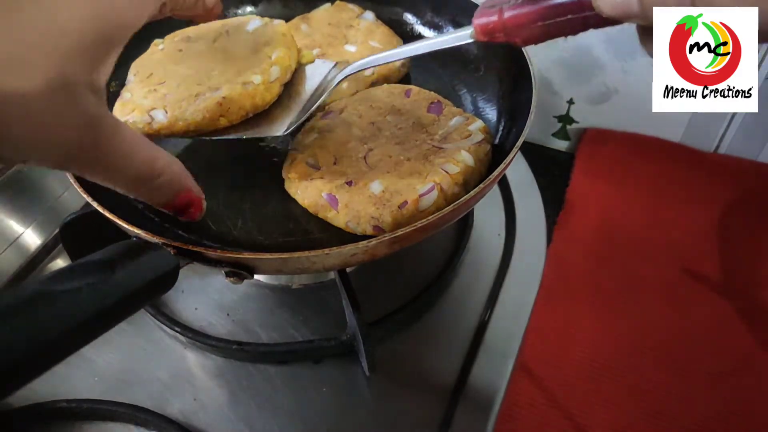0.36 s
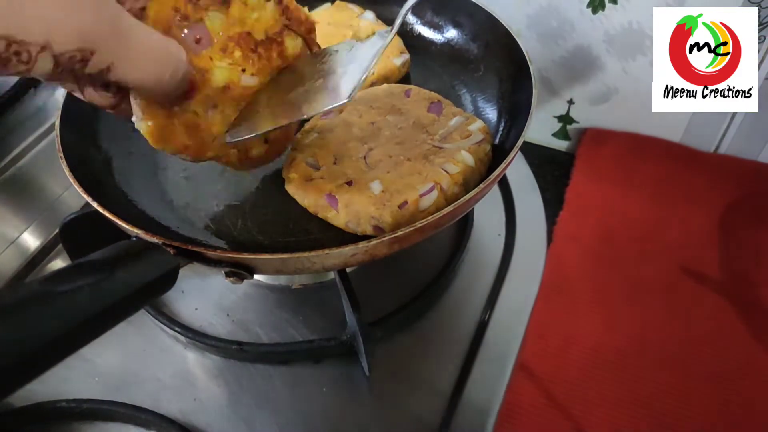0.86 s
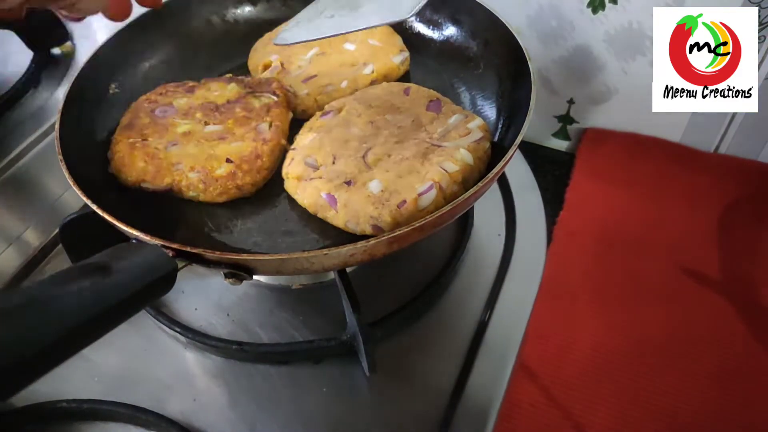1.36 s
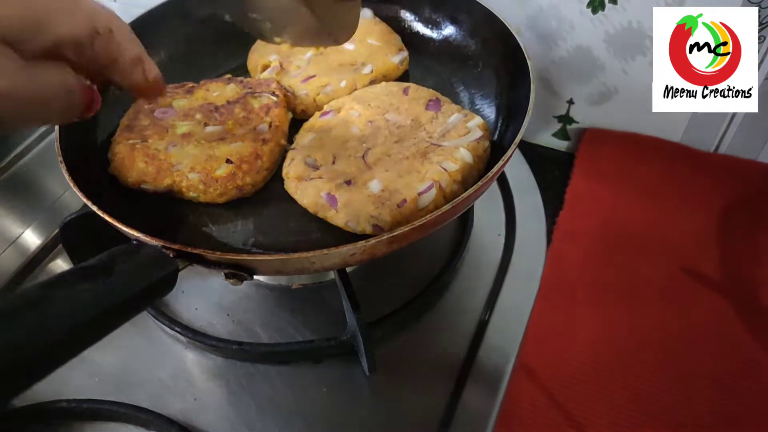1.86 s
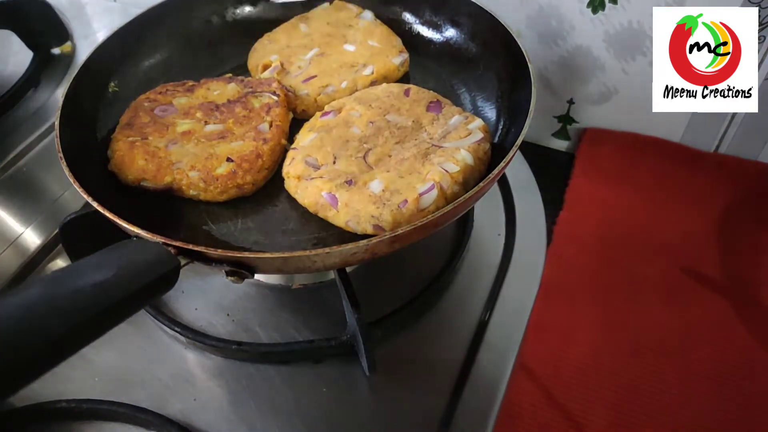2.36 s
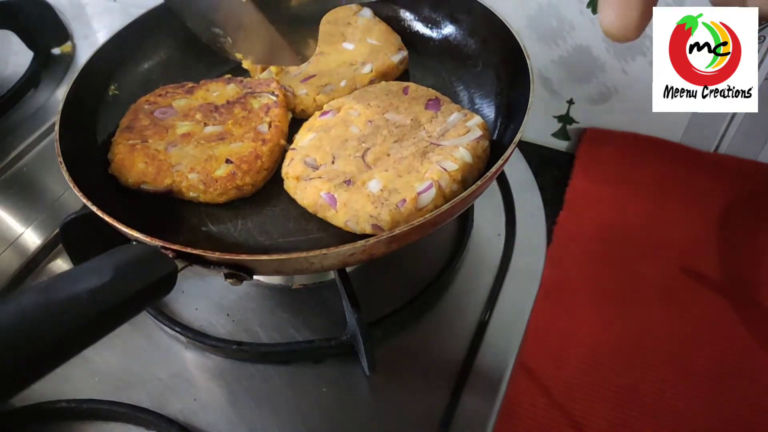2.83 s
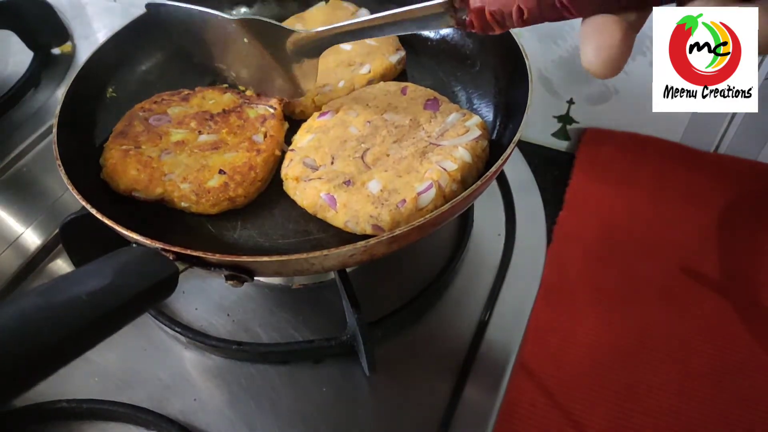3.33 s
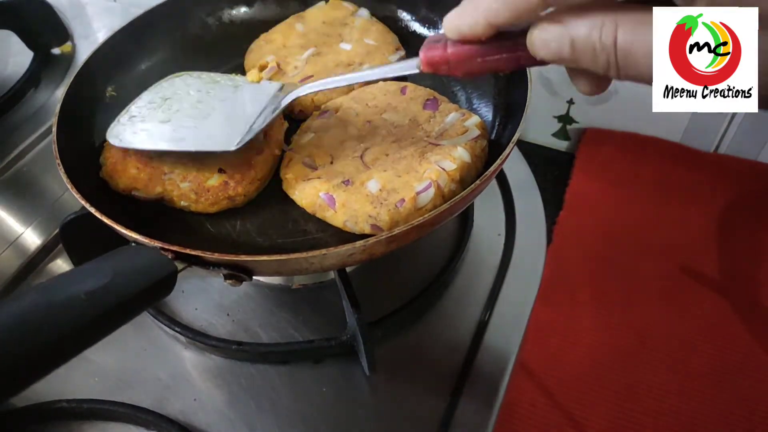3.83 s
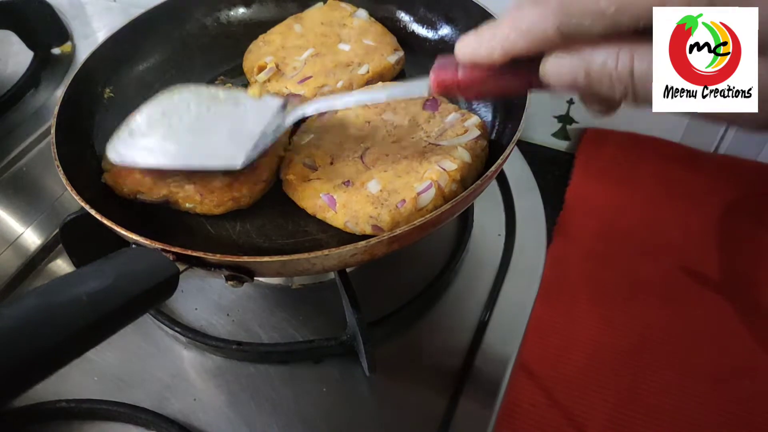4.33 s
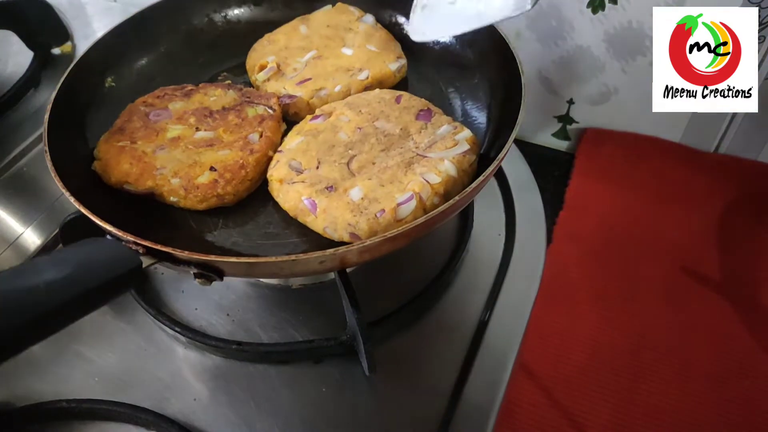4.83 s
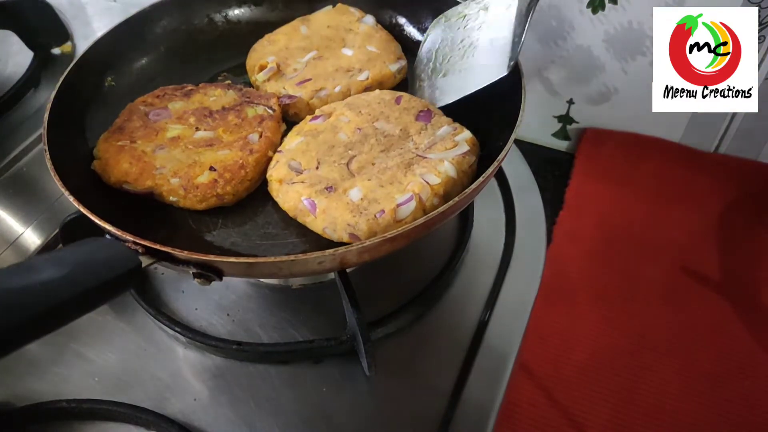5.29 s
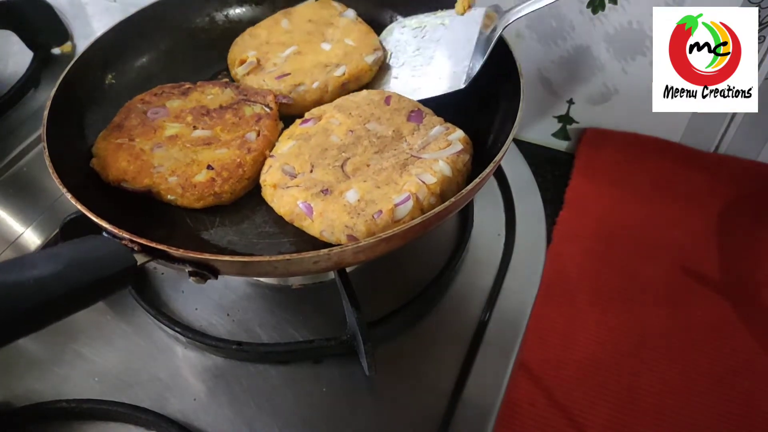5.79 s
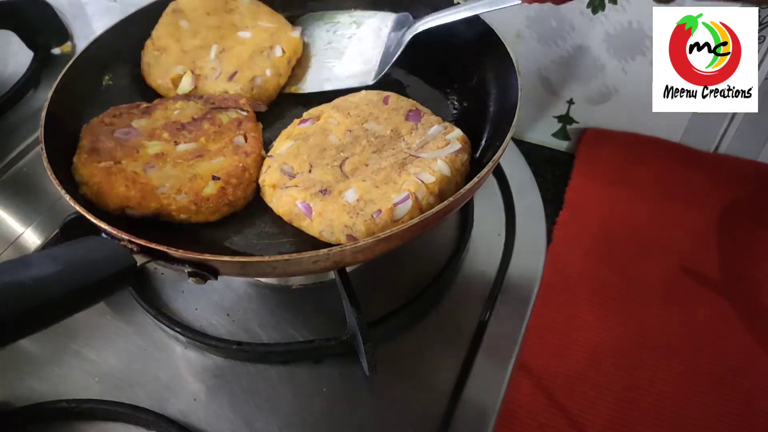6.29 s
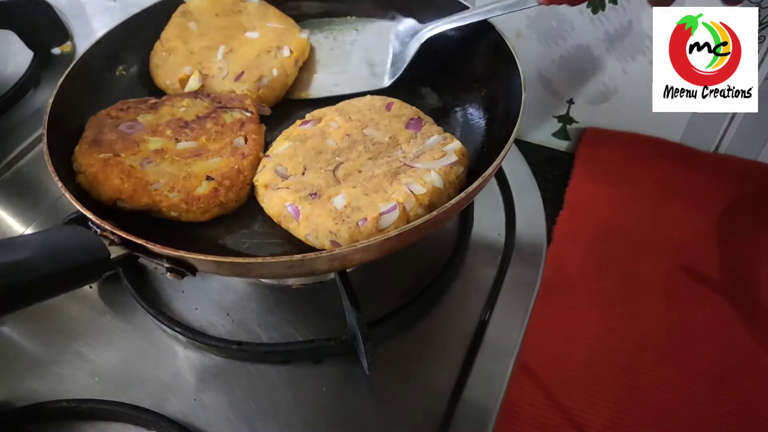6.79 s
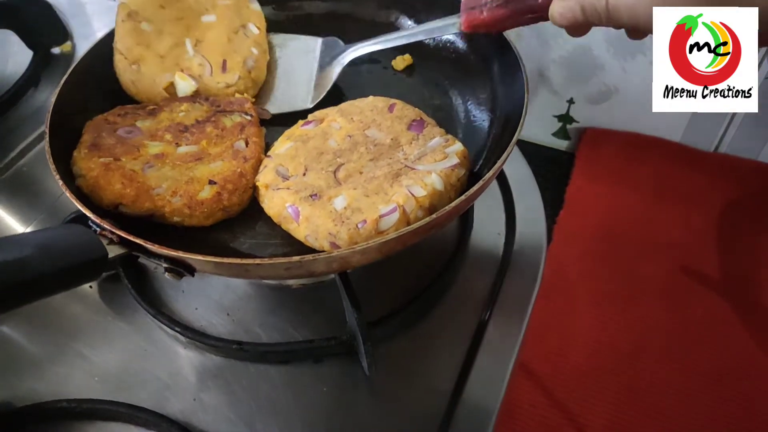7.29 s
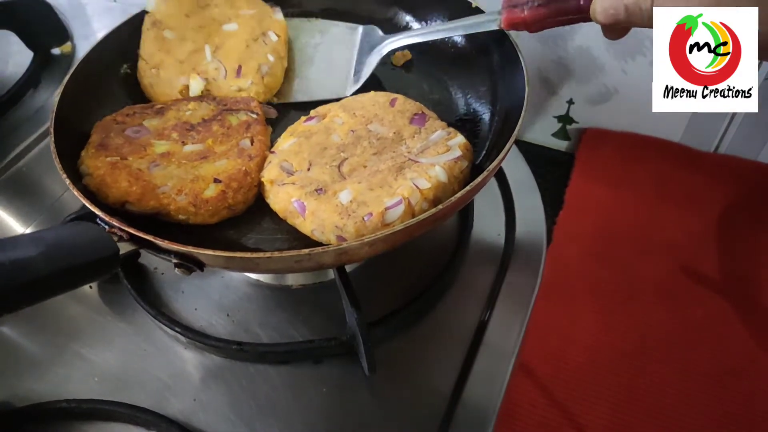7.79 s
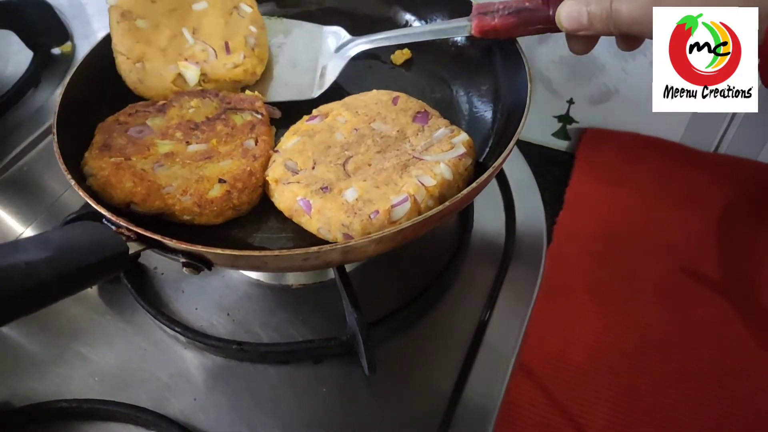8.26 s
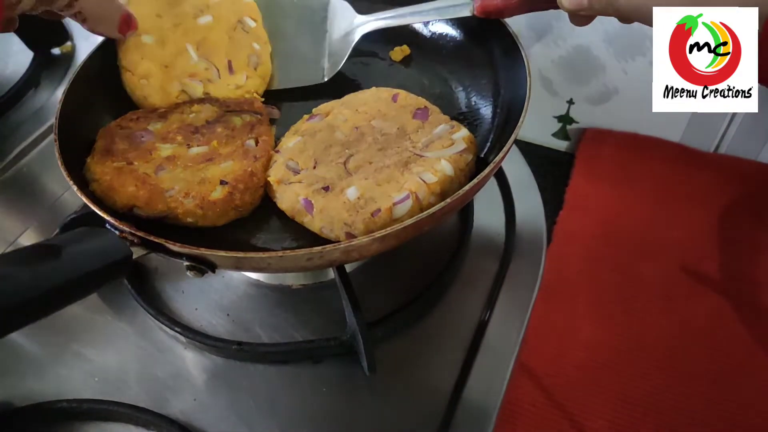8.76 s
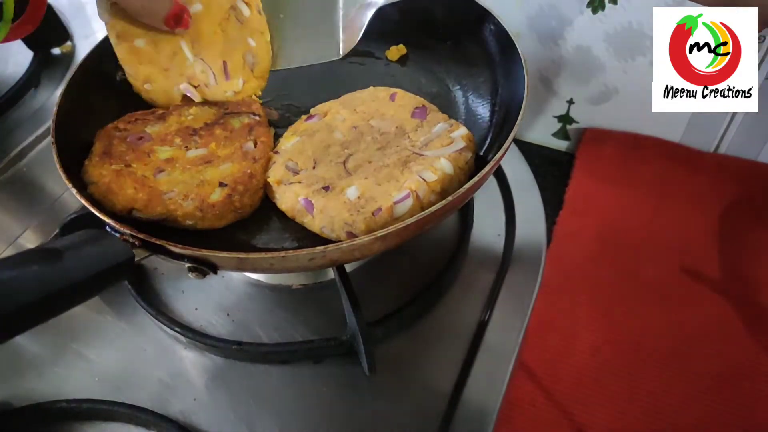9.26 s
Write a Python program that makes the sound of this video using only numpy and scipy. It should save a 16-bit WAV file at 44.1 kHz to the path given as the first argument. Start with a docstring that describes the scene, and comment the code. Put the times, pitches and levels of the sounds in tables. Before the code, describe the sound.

Close stereo sound of patties frying in a shallow pan in a kitchen. A fine bright sizzle starts quietly, flares as food is turned and pressed, sinks, then rises again. Large bubbles spit sharply over it. A steel spatula makes short grating scrapes and a few taps, and patties settle with soft low thuds. Low room rumble lies underneath.

```python
"""Patties sizzle in hot fat in a shallow pan, close to a two-port microphone in a kitchen: from the start steam
bubbles burst by the thousand as filtered clicks, over a low noise rumble of the room, and large ones spit and ring.
From about 1 s a steel spatula scrapes (random slips through pan modes) while a faint far tone glides up; then it
taps (chattering contacts) and food lands with soft thuds (puffs of low noise). The sizzle flares and sinks
throughout, and from 3.7 s a few droplets tick on the right port as one-sided pushes."""
import sys
import numpy as np
from scipy import signal
from scipy.io import wavfile
from scipy.ndimage import uniform_filter1d

SR = 44100
rng = np.random.default_rng(int(sys.argv[2]) if len(sys.argv) > 2 else 0)


def elevation(decibels):
    """Turn decibel levels (scalar or array-like) into linear amplitude ratios."""
    levels = np.asarray(decibels, float)
    return 10 ** (levels / 20)


def waveform_to_disk(signal):
    """Save audio, clipped to [-1, 1], as 16-bit WAV at the path in sys.argv[1]."""
    frames = np.transpose(np.atleast_2d(signal))
    scaled = np.clip(frames, -1, 1) * 32767
    samples = np.round(scaled).astype(np.int16)
    wavfile.write(sys.argv[1], SR, samples)


N = 424683  # length of the scene [samples]
LAG = 8  # how much later the left port hears the middle of the pan [samples]

# where the frying is liveliest: (time [s], pitch of the commonest bubble [Hz],
# how far it stands out of the fizz [dB], left minus right [dB])
SPOT = [(.9, 10200, -4, -2), (1.0, 6130, 3, -1.5), (1.3, 9600, -1, -0.5), (3.4, 8800, 0.5, 0),
        (4.0, 9700, 1, -0.5), (6.3, 10200, 0.5, 0), (7.8, 8440, 1, 0.5), (8.5, 9600, 0, 0.5),
        (8.9, 9900, 5, 4), (9.63, 8800, -5.5, -2)]
# modes in which pan and blade ring together: (frequency [Hz], relative level [dB], decay by 60 dB [s])
PAN = [(360, -0.5, 0.05), (635, -6, 0.1), (895, 2, 0.05), (1030, 0, 0.045), (1500, 6, 0.05),
       (2050, -4, 0.045), (2344, 5.5, 0.08), (2520, 4, 0.05), (2780, 5, 0.04), (3120, 5, 0.025),
       (3930, 5, 0.025), (4680, 5, 0.036), (5230, -0.5, 0.036), (6090, 0, .02)]


def evened(x):
    """Scales to rms 1."""
    return x / np.sqrt(np.mean(x ** 2) + 1e-20)


def read(points, hz):
    """Reads a spectrum on a log-frequency axis."""
    f, value = np.transpose(points)
    return np.interp(np.log(hz + 1), np.log(f + 1), value)


def add(mix, s, sound):
    """Mixes a sound in at time s."""
    part = mix[:, round(s * SR):][:, :sound.shape[1]]
    part += sound[:, :part.shape[1]]


def band(x, hz, width_hz):
    """A broad resonance."""
    return signal.lfilter(*signal.iirpeak(np.clip(hz, 50, 18000), max(hz / width_hz, .3), SR), x)


def bowl(x, pan_db, t60, echo_db, lag=LAG):
    """Direct sound, later on the left, then dense echoes off pan wall and hob; only their treble differs by port."""
    t = np.arange(round(.06 * SR)) / SR
    shared, left, right = rng.standard_normal((3, len(t)))
    low = signal.butter(1, 900, fs=SR)
    echoes = np.array([own + signal.lfilter(*low, shared - own) for own in (left, right)])
    echoes *= elevation(-60 * t / t60) * (t > .0005)
    echoes *= elevation(echo_db) / np.linalg.norm(echoes, axis=1)[:, None]
    # the direct sound joins the echoes as one sample per port
    echoes[0, lag] += elevation(pan_db / 2)
    echoes[1, 0] += elevation(-pan_db / 2)
    return signal.oaconvolve(x[None], echoes, axes=1)


def swells(rows, t):
    """dB of each row over time: a straight climb to its peak and a fall after it."""
    s, db, rise, fall = np.transpose(rows)[:4, :, None]
    return db - 10 * np.where(t < s, (s - t) / abs(rise), (t - s) / abs(fall))


def liveliness(t):
    """Relative dB of the fizz and of the dull sizzle: the flares add their power to the simmer."""
    # the fat's steady simmer between flares: (time [s], relative level of the fizz of small bubbles [dB])
    simmer = [(0, -42.5), (.33, -47), (.94, -48), (1.25, -42), (2.1, -35), (2.9, -38.5), (3.75, -42),
              (4.85, -44.5), (5.55, -42.5), (5.96, -34), (6.25, -30), (7.06, -31.5), (7.4, -36.5),
              (7.6, -38.5), (8.43, -43), (9.13, -37), (9.63, -34)]
    # flares as food lands, is pressed or is shifted on wet fat: (peak time [s], relative peak level [dB],
    # time to rise 10 dB [s, sign ignored], time to fall 10 dB [s, sign ignored], extra dull sizzle [dB])
    flares = [(0.944, -36, -0.01, 0.3, 8.5), (.98, -31.5, -0.0452, 0.07, 0.5), (1.32, -28, -0.07, .5, 0),
              (1.71, -27.5, -0.14, 0.24, -4.5), (3.18, -30, 0.2, 0.56, 1), (3.425, -27.5, 0.17, 0.13, -1.5),
              (3.975, -25.5, 0.1, 0.36, 2), (4.133, -22.5, 0.16, 0.016, -3.5), (4.2, -28, 0.06, 0.13, 1),
              (7.426, -36.5, 1, 0.4, 13), (7.74, -31.5, 0, 0.49, 4), (8.059, -28.5, 0.16, 0.22, 3),
              (8.57, -36.5, 0.2, 1.5, 9), (8.83, -26.5, 0.12, 0.23, 0), (9.08, -42, 0.1, -0.4, -9),
              (9.371, -36.5, 0.06, 0.1, 23)]
    power = elevation(np.vstack([np.interp(t, *np.transpose(simmer)), swells(flares, t)])) ** 2
    fizz_db = 10 * np.log10(power.sum(0))
    extra_db = np.transpose(flares)[4] @ power[1:] / power.sum(0)
    # large slow bubbles follow the fizz: 1.435 dB per dB, from -55 dB where the fizz is at -38 dB
    dull_db = -55 + 1.435 * (fizz_db + 38) + extra_db
    return fizz_db, dull_db


def bursts(per_s, spread_db, clump_db, echo_db, count):
    """Bubbles burst at many spots, mostly small, in clumps; each spot has its own pitch, side and echoes."""
    clumps = evened(uniform_filter1d(rng.standard_normal(N // 64 + 1), 8)).repeat(64)[:N]
    size = elevation(spread_db * np.minimum(rng.exponential(1, N), 4) + clump_db * clumps)
    size *= rng.random(N) < per_s / SR
    size *= rng.choice([-1., 1.], N)
    spot = rng.integers(0, count, N)
    out = np.zeros((2, N))
    for k, (height, side) in enumerate(rng.uniform(-1.083, 1, (count, 2))):
        clicks = size * (spot == k)
        clicks = 0.28 * clicks + band(clicks, 9500 + 5500 * height, 3300)
        out += bowl(clicks, 2 + 14 * side, .03, echo_db, lag=LAG + round(5 * side))[:, :N]
    return evened(out)


def sizzle():
    """Small bubbles give the bright fizz, humped at the commonest size; large ones the dull part."""
    # spectrum of the fizz: (frequency [Hz], relative level per Hz [dB])
    fizz_tone = [(1500, -34.5), (3000, -14), (5000, -4.5), (7000, -0.5), (8500, 1), (11000, 0),
                 (13500, -0.5), (15500, -3.5), (16500, -7.5)]
    # spectrum of the dull sizzle: (frequency [Hz], relative level per Hz [dB])
    dull_tone = [(300, -9), (800, -3.5), (1500, 1.5), (2500, 6.5), (3800, 5), (5500, 4.5), (9000, -12)]
    surge_db, tint_db = .8, 1.2  # rms of the fizz's surges and of its patches of colour [dB]

    def whitened(z):
        """Flattens the mean spectrum of bursts."""
        return z / np.sqrt(uniform_filter1d(np.mean(abs(z) ** 2, (0, 2)), 9))[:, None]

    hz, t, small = signal.stft(bursts(4500, 3.8, 1.3, 1, count=24), SR, nperseg=256, noverlap=192)
    large = signal.stft(bursts(3000, 4, 1.5, 4, count=10), SR, nperseg=256, noverlap=192)[2]
    small, large = whitened(small), whitened(large)
    fizz_db, dull_db = liveliness(t)

    s, *columns = np.transpose(SPOT)
    pitch, hump_db, pan_db = (np.interp(t, s, c) for c in columns)
    octaves = np.log2((hz[:, None] + 1) / pitch)
    hump = elevation(hump_db * np.exp(-(octaves / .25) ** 2))
    fizz = elevation(read(fizz_tone, hz))[:, None] * hump
    dull = elevation(read(dull_tone, hz))[:, None]
    fizz, dull = (m / np.sqrt(np.sum(m ** 2, 0)) for m in (fizz, dull))

    # the fizz surges several times a second and its colour drifts in patches
    surge = uniform_filter1d(rng.standard_normal(len(t)), 40)
    tint = rng.standard_normal(small.shape[1:])
    tint = uniform_filter1d(uniform_filter1d(tint, 12, 0), 70, 1)
    small *= elevation(surge_db * evened(surge) + tint_db * evened(tint))

    z = small * fizz * elevation(fizz_db + 1.5) * elevation([pan_db / 2, -pan_db / 2])[:, None]
    z += large * dull * elevation(dull_db + 1.5) * elevation([-.8, .8])[:, None, None]
    return signal.istft(z, SR, nperseg=256, noverlap=192)[1][:, :N]


def rumble():
    """Low room noise, near alike at both ports in the bass, with drifting patches; and the faint far tone."""
    # spectrum of the room: (frequency [Hz], relative level per Hz [dB])
    room = [(8, 3.5), (24, -11), (40, -21), (60, -19.5), (90, -10), (125, -16.5), (177, -13), (225, -34),
            (270, -21), (450, -29), (750, -32), (1500, -29.5), (3000, -33.5)]
    # course of the rumble, lifted 2 dB below: (time [s], level [dB])
    room_course = [(0.0, -49), (8.39, -46), (9.63, -49.5)]
    # left-right likeness of the rumble: (frequency [Hz], correlation [0 to 1])
    likeness = [(25, 0.78), (60, 0.9), (130, 0.89), (300, 0.82), (700, 0.26), (2000, 0.18)]
    # the faint far tone, lifted 3 dB below: (time [s], pitch [Hz], level [dB])
    whine = [(0.92, 549, -64), (1.274, 580, -63.5), (1.33, 590, -68)]
    frames, hz = N // 512 + 5, np.fft.rfftfreq(2048, 1 / SR)
    a, b, c, d, patches = rng.standard_normal((frames, 1025, 5)).T
    patches = evened(uniform_filter1d(uniform_filter1d(patches, 6, 0), 8, 1))
    same = np.clip(read(likeness, hz), -1, 1)[:, None]
    left = a + 1j * b
    right = same * left + np.sqrt(1 - same ** 2) * (c + 1j * d)
    z = np.array([left, right]) * elevation(read(room, hz)[:, None] + 2.6 * patches)
    out = evened(signal.istft(z, nperseg=2048, noverlap=1536)[1][:, :N])
    out *= elevation(np.interp(np.arange(N) / SR, *np.transpose(room_course)) + 2.0)

    s, pitch, db = np.transpose(whine)
    t = np.arange(s[0], s[-1], 1 / SR)
    phase = 2 * np.pi * np.cumsum(np.interp(t, s, pitch)) / SR
    tone = elevation(np.interp(t, s, db) + 3.0) * np.sin(phase)
    add(out, s[0], np.tile(tone * signal.windows.tukey(len(t), .2), (2, 1)))
    return out


def snap(hz):
    """One bubble bursting: a thin crack of the skin, then a few cycles of ringing."""
    turns = np.arange(round(3 * SR / hz)) * hz / SR
    crack = band(band(1. * (turns == 0), 9000, 14000), 9000, 14000)
    ringing = np.sin(2 * np.pi * turns) * np.sin(np.pi * np.sqrt(turns / turns[-1])) ** 2
    sound = ringing + 0.52 * crack
    return sound / abs(sound).max()


def spits():
    """Large bubbles burst, lesser ones crackle over the fizz; echoes trail each."""
    # large bubbles, lifted 1.5 dB below: (time [s], peak level before panning and echoes [dB], left minus right [dB])
    large_ones = [(0.1108, -17, 9), (0.2664, -20, 14), (0.6557, -20, 10), (0.8837, -17, -10),
                  (1.0019, -17, -4), (1.133, -24, -1), (1.7167, -12, 2), (2.0417, -16, -5),
                  (2.294, -12, 11), (2.594, -16, 1), (3.4328, -6.5, 9), (4.1147, -9, 0), (4.1322, -5.5, 3),
                  (4.1379, -3, 2), (4.592, -19, 0), (5.162, -21, 0), (5.2803, -16, 3), (5.3796, -16, 2),
                  (5.4752, -18, 2), (5.5399, -15, 4), (5.8005, -11, 1), (5.834, -11, 1), (6.7045, -11, 5),
                  (6.8814, -11, 1), (7.0608, -7, 4), (7.0858, -10, 3), (7.1635, -14, 7), (7.6374, -10, -2),
                  (7.7803, -11, 0), (7.93, -12, 5), (8.7912, -12, 4), (8.842, -7, 4), (8.8499, -8, 6),
                  (8.9177, -9, 7), (8.9484, -12, 5), (8.9956, -13, 4), (9.0077, -14, 3), (9.048, -12, 4),
                  (9.0656, -13, 5), (9.0844, -12, -2), (9.2706, -15, 2), (9.359, -14, 0), (9.4604, -14, -6),
                  (9.5804, -12, 3)]
    out = np.zeros((2, N))
    when, size, side = rng.random((round(50 * N / SR), 3)).T  # 50 lesser ones a second
    when = when * N / SR
    crackle_db = liveliness(when)[0] * .7 - 4 * np.log(size + .1) - 5  # livelier fat, louder crackle
    for s, db, pan_db in [*large_ones, *zip(when, crackle_db, 14 * side - 4)]:
        hz = np.interp(s, *np.transpose(SPOT)[:2]) * rng.uniform(.9, 1.3)  # near the commonest size
        add(out, s, elevation(db + 1.5) * bowl(snap(hz), pan_db, .028, 2))
    return out


def ring(weight_db):
    """The pan's modes after one click."""
    t = np.arange(round(.15 * SR)) / SR
    hz, db, t60 = np.transpose(PAN)[:, :, None]
    return (elevation(db + weight_db - 60 * t / t60) * np.sin(2 * np.pi * hz * t)).sum(0)


def scrapes():
    """Uneven slips under each stroke feed the pan's low modes and the flexing blade, whose pitch climbs."""
    # strokes of blade or food dragged over the pan: (start [s], length [s], level of the slips before
    # panning and echoes [dB], gain of the blade's song [dB], starting pitch of the song [Hz])
    strokes = [(0.951, 0.13, -58.5, 8, 2180), (1.341, 0.24, -51, 0, 2000), (1.677, 0.061, -47.5, 5, 2000),
               (1.938, 0.07, -51, -16, 1500), (3.099, 0.4, -52.5, 4.5, 2300), (3.93, 0.23, -44.5, -4, 2300),
               (6.105, 0.17, -44.5, 7.5, 2700), (6.328, 0.087, -43.5, -5, 2640),
               (6.769, 0.12, -49, 2, 2580), (6.889, 0.12, -43.5, -10, 1560), (7.027, 0.088, -45, 8, 2630),
               (7.153, .1, -46.5, 2, 2570), (7.38, 0.1, -50.5, 10, 2200), (8.103, 0.056, -47.5, -16, 1520),
               (9.341, 0.21, -54, -2, 2070)]
    bend, song_hz = .06, 200  # share by which the song climbs through a stroke; width of the song [Hz]
    out = np.zeros((2, N))
    body = ring(-12 * np.log2(np.transpose(PAN)[0][:, None] / 950) ** 2)
    body /= np.linalg.norm(body)
    hold = np.exp(-np.pi * song_hz / SR)
    for s, length, db, blade_db, hz in strokes:
        u = np.arange(0, length, 1 / SR) / length  # share of the stroke done
        grip = evened(uniform_filter1d(rng.standard_normal(len(u)), 600))  # the blade catches and lets go
        slips = elevation(3 * np.minimum(rng.exponential(1, len(u)), 4) + 1.5 * grip)
        slips *= rng.random(len(u)) < 2500 / SR
        slips = evened(slips * rng.choice([-1., 1.], len(u)))
        slips *= signal.windows.tukey(len(u), .4) * elevation(-4 * u)
        sound = signal.oaconvolve(slips, body)
        # a resonance that follows the moving pitch
        turn = np.exp(2j * np.pi * np.cumsum(hz * (1 + bend * u + 0.012 * grip)) / SR)
        song = (turn * signal.lfilter([np.sqrt(2 - 2 * hold ** 2)], [1, -hold], slips / turn)).real
        rasp = 1.2 * band(slips, 2400, 2000)  # broad grating noise
        sound[:len(u)] += elevation(blade_db) * song + rasp
        add(out, s, elevation(db) * bowl(sound, -4, 0.06, -3))
    return out


def taps():
    """A short chatter of contacts rings the modes near the pitch of the blow; each place on the pan favours others."""
    # blows of the blade: (time [s], peak level before panning and echoes [dB], pitch rung hardest [Hz],
    # distance from it at which modes are 6 dB weaker [octaves], time in which contact dies to 5 % [s])
    blows = [(1.287, -28, 1070, 0.84, 0.0071), (4.138, -16.5, 1500, 2.8, 0.003),
             (5.063, -21.5, 2400, 2.3, 0.022), (5.194, -23, 2600, 1.4, 0.013),
             (6.099, -22.5, 1500, 0.45, 0.008), (7.735, -14, 1720, 2.9, 0.022),
             (7.844, -28.5, 890, 0.87, 0.018), (7.6368, -22.5, 3500, 1.6, 0.0013)]
    out, t = np.zeros((2, N)), np.arange(5000) / SR
    modes = np.transpose(PAN)[0][:, None]
    for s, db, hz, octaves, length in blows:
        chatter = 0.63 * rng.standard_normal(len(t)) * np.exp(-3 * t / length)
        chatter[0] = 1.5  # the first contact
        place_db = 2 * rng.standard_normal(modes.shape) - 6 * (np.log2(modes / hz) / octaves) ** 2
        ringing = signal.oaconvolve(chatter, ring(place_db))
        clack = band(chatter, hz * 1.6, 5000)  # gritty steel on steel
        sound = ringing[:len(t)] / abs(ringing).max() + 1.35 * clack / abs(clack).max()
        add(out, s, elevation(db) * bowl(sound / abs(sound).max(), -3.0, .06, -6))
    return out


def thuds():
    """Soft blows: a dying puff of low noise around one pitch."""
    # thuds of food and of the pan on its stand: (time [s], peak level before panning and echoes [dB],
    # pitch [Hz], time in which the puff dies to 5 % [s])
    soft_blows = [(1.291, -39.5, 184, 0.17), (1.46, -38, 326, 0.16), (1.938, -37.5, 312, 0.21),
                  (2.693, -39, 168, 0.081), (3.922, -35.5, 357, 0.17), (4.208, -34, 323, 0.15),
                  (5.066, -44.5, 294, 0.072), (5.189, -37.5, 393, 0.11), (6.371, -34, 200, 0.32),
                  (8.144, -37.5, 180, 0.15), (8.581, -35.5, 355, 0.083), (8.699, -39.5, 377, 0.047)]
    out, t = np.zeros((2, N)), np.arange(round(.25 * SR)) / SR
    for s, db, hz, length in soft_blows:
        puff = rng.standard_normal(len(t)) * np.exp(-3 * t / length) * np.minimum(t / 0.0045, 1)
        puff = band(band(puff, hz, 0.5 * hz), hz, 7.5 * hz)
        add(out, s, elevation(db) * bowl(puff / abs(puff).max(), -0.7, 0.029, -7.5))
    return out


def ticks():
    """A one-sided push on the right diaphragm, barely felt on the left."""
    # droplets that land on the right port: (time [s], level, 4 dB raised on the right and 18 dB cut on the left [dB])
    droplets = [(3.6755, -19.5), (3.758, -20.5), (3.8988, -7.5), (6.749, -17.5), (6.8936, -15.5),
                (6.9847, -6.5)]
    out, t = np.zeros((2, N)), np.arange(-20, 400) / SR
    push = np.exp(-(t / .00004) ** 2) - .04 * np.exp(-t / .001) * (t > 0)  # with a slow slight rebound
    for s, db in droplets:
        add(out, s + t[0], elevation(db + np.array([[-18.], [4.]])) * push)
    return out


def scene():
    """All sources at the two ports."""
    return sizzle() + rumble() + spits() + scrapes() + taps() + thuds() + ticks()


def band_limit(x):
    """A steep low-pass at the top of the band."""
    return signal.sosfilt(signal.butter(12, 16980, fs=SR, output="sos"), x)


def record(dry):
    """Limits the band with a steep low-pass at 15950 Hz and finishes the mix."""
    lowpass = signal.firwin(201, 15950, window=("kaiser", 5), fs=SR)
    mix = signal.oaconvolve(dry, lowpass[None], "same")
    return band_limit(mix)


dry = scene()
out = record(dry)
waveform_to_disk(out)
```